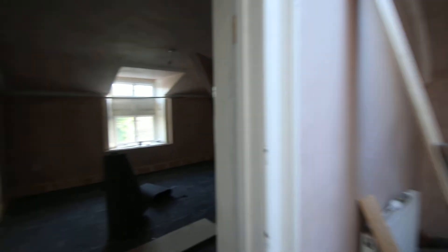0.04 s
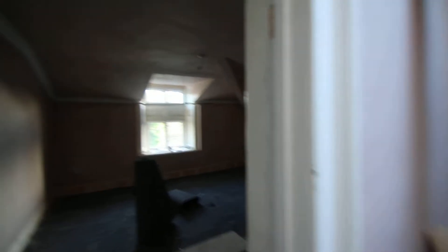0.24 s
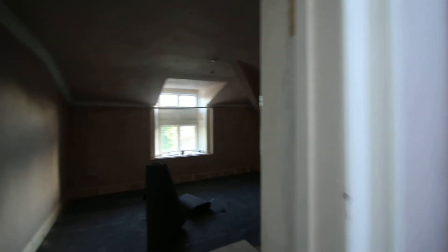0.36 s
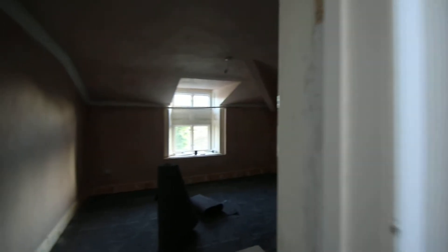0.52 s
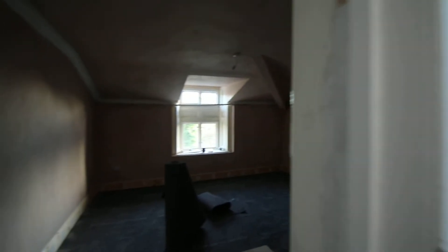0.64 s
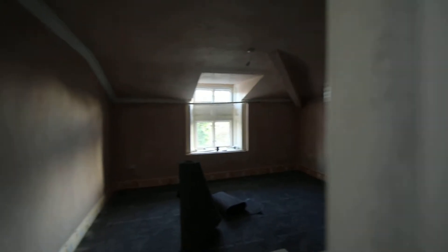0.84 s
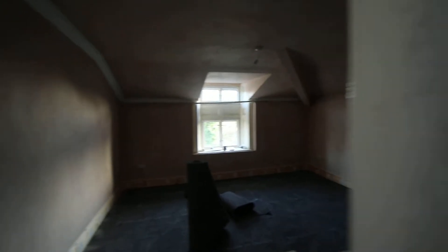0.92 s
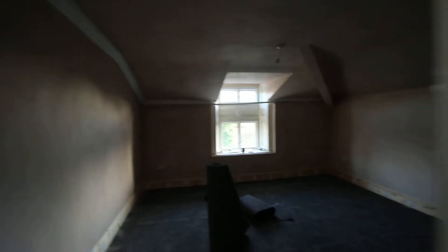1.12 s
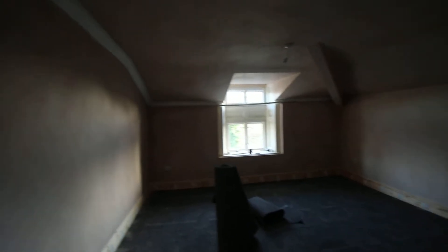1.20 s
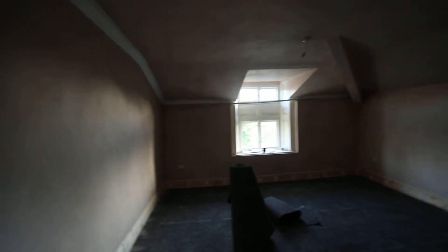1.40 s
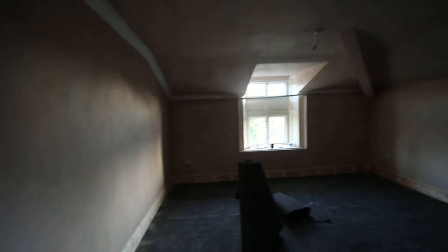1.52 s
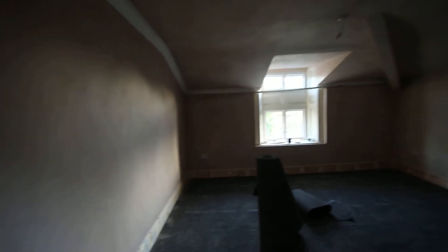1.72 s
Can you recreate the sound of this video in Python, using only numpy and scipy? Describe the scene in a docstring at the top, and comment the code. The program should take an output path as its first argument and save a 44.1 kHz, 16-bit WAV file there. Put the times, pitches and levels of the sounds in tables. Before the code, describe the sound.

Slow footsteps on bare floorboards in an empty room, one firm thud, then a softer step

```python
"""Empty house with bare floorboards: slow steps, heard by a hand-held stereo microphone.
One firm step, then a soft one whose sole rolls down: contact pushes ring board modes and diffuse room sound.
Close by: two dry clicks (short modes), a bump (pressure swings) and cloth rustle (patchy noise).
Behind: faint room tone and hiss (shaped noise), swelling airy tones (noise through narrow resonances)."""
import sys
import numpy as np
from scipy import signal
from scipy.io import wavfile

SR = 44100
rng = np.random.default_rng(int(sys.argv[2]) if len(sys.argv) > 2 else 0)


def magnitude_from_level(level_db):
    """Linear magnitude for a level in decibels (20 dB per decade)."""
    exponent = np.asarray(level_db, float) / 20
    return 10 ** exponent


def generate_wav(sig):
    """Save sig (samples, or channels by samples) to the path in sys.argv[1] as 16-bit PCM at SR."""
    pcm = np.round(np.clip(np.atleast_2d(sig).T, -1, 1) * 32767).astype(np.int16)
    wavfile.write(sys.argv[1], SR, pcm)


N = 77175


def at_hz(points, hz):
    """Reads a table on a log-frequency axis."""
    table_hz, values = np.transpose(points)
    return np.interp(np.log(hz), np.log(table_hz), values)


def pan(db):
    """Left and right gains; positive dB favours the left."""
    return magnitude_from_level(np.array([[db / 2], [-db / 2]]))


def filtered(kind, order, hz, x):
    """Butterworth filter."""
    return signal.sosfilt(signal.butter(order, hz, kind, fs=SR, output="sos"), x)


def drift(rate_hz):
    """Slow random wander, spread 1: low-passed noise made at SR / 40, then interpolated."""
    r = np.exp(-2 * np.pi * rate_hz * 40 / SR)
    noise = rng.standard_normal(N // 40 + 2002)
    slow = signal.lfilter([1], [1, -2 * r, r * r], noise)[2000:]
    return np.interp(np.arange(N) / 40, np.arange(len(slow)), slow / slow.std())


def ring(push, hz, t60_s):
    """Two-pole resonance: a unit click starts a decaying sine of height 1."""
    r, w = magnitude_from_level(-60 / (t60_s * SR)), 2 * np.pi * hz / SR
    return signal.lfilter([0, np.sin(w)], [1, -2 * r * np.cos(w), r * r], push + 1e-18)


def bands(spectrum, likeness, shape):
    """Half-octave bands of stereo noise, each with its level, left-right likeness and shape(hz) in time."""
    out = 0
    edges_hz = 26.9 * 2 ** np.arange(0, 9.6, .5)
    white = rng.standard_normal((2, 2, N + 8000))  # neighbouring bands use different noise
    for k, (low_hz, high_hz) in enumerate(zip(edges_hz, edges_hz[1:])):
        mid, side = filtered("band", 2, [low_hz, high_hz], white[k % 2])[:, 8000:]
        hz = np.sqrt(low_hz * high_hz)
        alike = np.clip(at_hz(likeness, hz), -.99, .999)
        stereo = np.sqrt(1 + alike) * mid + np.sqrt(1 - alike) * side * [[1], [-1]]
        out = out + magnitude_from_level(at_hz(spectrum, hz)) * shape(hz) * stereo
    return out


# shoe meets board: (t/s, level/dB, hardness f/Hz, extra level of joist modes/dB)
CONTACTS = [(0.2013, -22.5, 2730, 4), (0.206, -19.5, 675, 5), (0.2245, -17, 436, -3.5),
            (0.241, -26.5, 400, 0.5), (.283, -29, 410, -10), (.345, -32.5, 394, 3.5), (.392, -45, 398, -4),
            (0.444, -45, 395, 1), (1.0754, -34.5, 1400, -25), (1.081, -40.5, 490, -6),
            (1.092, -34.5, 247, 0.5), (1.101, -38.5, 300, -18), (1.141, -42.5, 315, -14),
            (1.152, -35, 494, -25), (1.165, -36, 450, -7), (1.18, -39.5, 304, -19), (1.223, -38.5, 244, 2)]
# floorboard and joist modes: (f/Hz, level/dB, t60/s)
BOARD_MODES = [(54.8, -25, 0.56), (96.55, -11.5, 0.49), (108.2, -18, 0.59), (116.6, 0.5, 0.039),
               (152, -5.5, 0.11), (166.4, -33, 0.47), (201.2, -0.5, 0.11), (214, -20.5, 0.16),
               (241.4, -19.5, 0.54), (313.5, -18, 0.28), (348, -16, 0.24), (361, -4.5, 0.077),
               (389, -16, 0.33), (510, -5.5, 0.061), (548, -19, 0.057), (705, -5, 0.057),
               (846, -0.5, 0.0078), (870, -4.5, 0.026), (1086, -0.5, 0.024), (1158, -3.5, 0.043),
               (1413, -7, 0.029), (1530, -2, 0.015)]
# colour of the diffuse step sound: (f/Hz, level/dB)
KNOCK_SPECTRUM = [(40, -8), (100, -30), (200, 19), (400, 10.5), (500, -0.5), (700, 3.5), (1100, 1.5),
                  (1600, 3.5), (2000, -8), (2800, 6), (5000, -4), (9000, 0.5), (15000, -8)]
# room decay: (f/Hz, t60/s)
ROOM_T60 = [(60, .7), (400, .45), (1000, .62), (1600, .58), (2500, .33), (10000, .25)]
# room stereo: (f/Hz, left-right likeness)
ROOM_LIKENESS = [(60, 1.0), (180, 0.98), (550, 0.8), (1650, 1), (4970, -0.054), (15000, -0.38)]
STRIKE_SPREAD_DB, JOIST_BELOW_HZ = 1.0, 125
ROOM_DB, ROOM_RISE_S = -5, 0.0033
DIFFUSE_ABOVE_HZ, FLOOR_LOWEST_HZ = 480, 42  # below the first, separate modes carry the sound
SETTLE_S, SETTLE_DB, SETTLE_TIME_S = 1.108, -2.5, .004  # settling sole muffles ringing boards
SOFT_STEP_FROM_S, SOFT_STEP_BODY_HZ = .9, (190, 290)
SOFT_STEP_THIN_DB = -5.5  # soft step: room, and modes above the joists outside its body
STEP_PAN_DB = 1.2


def contact_pushes():
    """One push per contact: a click low-passed at its hardness, as by the sole."""
    pushes = np.zeros((len(CONTACTS), N))
    for push, (s, db, hard_hz, _) in zip(pushes, CONTACTS):
        r = np.exp(-2 * np.pi * hard_hz / SR)
        click = (np.arange(N) == int(s * SR)) + 1e-18
        push[:] = signal.lfilter([magnitude_from_level(db) * (1 - r) ** 2], [1, -2 * r, r * r], click)
    return pushes


def board_ring(pushes, thin_db):
    """Pushes excite the board and joist modes; the settling sole lowers what already rings."""
    contact_s, joist_db = np.array(CONTACTS)[:, 0], np.array(CONTACTS)[:, 3]
    modes_hz = np.array(BOARD_MODES)[:, 0]
    low_hz, high_hz = SOFT_STEP_BODY_HZ
    outside_body = (modes_hz > JOIST_BELOW_HZ) & ((modes_hz < low_hz) | (modes_hz > high_hz))
    strength_db = STRIKE_SPREAD_DB * rng.standard_normal((len(CONTACTS), len(BOARD_MODES)))
    strength_db += np.outer(joist_db, modes_hz < JOIST_BELOW_HZ) + np.outer(thin_db, outside_body)
    strengths = magnitude_from_level(strength_db)
    groups = np.array([contact_s < SETTLE_S, contact_s >= SETTLE_S])
    ringing = np.zeros((2, N))
    for k, (hz, db, t60_s) in enumerate(BOARD_MODES):
        drive = groups * strengths[:, k] @ pushes
        ringing += (-1) ** k * magnitude_from_level(db) * ring(drive, hz, t60_s)
    before, after = ringing
    settled = np.clip((np.arange(N) / SR - SETTLE_S) / SETTLE_TIME_S, 0, 1)
    return before * magnitude_from_level(SETTLE_DB * settled) + after


def room_ring(pushes, thin_db):
    """Diffuse sound: pushes convolved with stereo noise that rises fast and dies by frequency."""
    t = np.arange(N) / SR
    rise = 1 - np.exp(-t / ROOM_RISE_S)
    echo = bands(KNOCK_SPECTRUM, ROOM_LIKENESS, lambda hz: magnitude_from_level(-60 * t / at_hz(ROOM_T60, hz)) * rise)
    room = signal.fftconvolve(echo, (magnitude_from_level(thin_db) @ pushes)[None], axes=1)[:, :N]
    return filtered("high", 2, DIFFUSE_ABOVE_HZ, room)


def steps():
    """Each contact pushes the boards' modes and the dying diffuse sound of the room."""
    pushes = contact_pushes()
    thin_db = SOFT_STEP_THIN_DB * (np.array(CONTACTS)[:, 0] > SOFT_STEP_FROM_S)
    both = board_ring(pushes, thin_db) + magnitude_from_level(ROOM_DB) * room_ring(pushes, thin_db)
    return pan(STEP_PAN_DB) * filtered("high", 3, FLOOR_LOWEST_HZ, both)


# board hum as the weight rolls over: (t/s, level/dB, f/Hz, time to peak/s)
HUMS = [(0.223, -32, 399.3, 0.0064), (.29, -41.5, 348, 0.025), (.385, -47.5, 389, 0.026),
        (1.142, -49, 254, 0.014)]


def board_hum():
    """A single mode swells and dies under each shift of weight: sine under age * exp(-age)."""
    out = 0
    for s, db, hz, peak_s in HUMS:
        age_s = np.maximum(np.arange(N) / SR - s, 0)
        envelope = age_s / peak_s * np.exp(1 - age_s / peak_s)
        out = out + magnitude_from_level(db) * envelope * np.sin(2 * np.pi * hz * age_s)
    return pan(STEP_PAN_DB) * out


# band kept of the clicks: low f/Hz, high f/Hz
CLICK_BAND_HZ = [600, 11500]


def clicks(touches, modes, turn):
    """Small hard touches ring short-lived modes; every second mode is scaled by turn on the right."""
    out = np.zeros((2, N))
    for s, db, pan_db in touches:
        touch = magnitude_from_level(db) * (np.arange(N) == int(s * SR))
        for k, (hz, mode_db, t60_s) in enumerate(modes):
            mode = (-1) ** k * magnitude_from_level(mode_db) * ring(touch, hz, t60_s)
            out += pan(pan_db) * [[1], [turn ** (k % 2)]] * mode
    return filtered("band", 3, CLICK_BAND_HZ, out)


# first near click, touches: (t/s, level/dB, pan/dB)
TICK_TOUCHES = [(1.3002, -33, 5.7), (1.3005, -31, 9.5), (1.3008, -35, 8.1), (1.3022, -39, 2.4)]
# its modes: (f/Hz, level/dB, t60/s)
TICK_MODES = [(4410, -6, 0.012), (6540, -12.5, 0.0032), (8350, 3.5, 0.0021), (8980, 5, 0.0025),
              (11300, -4.5, 0.0042)]


def tick():
    """First dry click: touches ringing high, short modes."""
    return clicks(TICK_TOUCHES, TICK_MODES, turn=.8)


# second near click, touches: (t/s, level/dB, pan/dB)
SNAP_TOUCHES = [(1.4040, -67, 15), (1.4047, -29.5, -5.5), (1.4054, -31.5, -18.5)]
# its modes: (f/Hz, level/dB, t60/s)
SNAP_MODES = [(805, -2.5, 0.022), (1060, -15, 0.024), (1550, -20, 0.053), (1960, -8, 0.021),
              (2343, 3.5, .014), (3400, -5, 0.016), (3740, -17, 0.026), (5700, -8, 0.0046),
              (7490, -16.5, 0.014), (9500, -39, 0.0027)]


def snap():
    """Second dry click: lower modes too, every second one inverted on the right."""
    return clicks(SNAP_TOUCHES, SNAP_MODES, turn=-1.12)


# bumps on the microphone body: (t/s, level/dB, length/s, pan/dB)
BUMPS = [(1.442, -47, 0.0068, 24), (1.453, -43, 0.0056, 3), (1.4575, -38.5, 0.0018, 6),
         (1.475, -39.5, 0.01, 18.5), (1.485, -40, 0.0077, 3)]


def bumps():
    """Single soft swings of pressure (sine squared), alternately up and down."""
    t = np.arange(N) / SR
    out = np.zeros((2, N))
    for k, (s, db, length_s, pan_db) in enumerate(BUMPS):
        swing = np.sin(np.pi * np.clip((t - s) / length_s, 0, 1)) ** 2
        out += (-1) ** k * pan(pan_db) * magnitude_from_level(db) * swing
    return out


# cloth rustle: (t/s, level/dB, rise/s, fall/s)
RUSTLES = [(.48, -52, 0.051, 0.086), (1.462, -51.5, 0.0083, 0.1)]
# rustle colour: (f/Hz, level/dB)
RUSTLE_SPECTRUM = [(150, 28.5), (500, 22), (1500, 2), (3000, 16.5), (6000, 5.5), (12000, -7)]
# stereo of rustle and room tone: (f/Hz, left-right likeness)
TONE_LIKENESS = [(60, 0.88), (180, 0.49), (550, 0.75), (1650, 0.15), (4970, 0.021), (15000, 0.025)]


def rustle():
    """Patchy noise with a Gaussian rise and an exponential fall."""
    t = np.arange(N) / SR
    swell = 0
    for s, db, rise_s, fall_s in RUSTLES:
        decay = np.where(t < s, ((s - t) / rise_s) ** 2, (t - s) / fall_s)
        swell = swell + magnitude_from_level(db) * np.exp(-decay)
    cloth = bands(RUSTLE_SPECTRUM, TONE_LIKENESS, lambda hz: magnitude_from_level(1.5 * drift(25.0)))
    return swell * cloth / cloth.std()


# room tone and hiss: (f/Hz, level/dB)
TONE_SPECTRUM = [(22, -16), (40, -2.5), (90, 0.5), (200, -4), (450, -4), (700, -7.5), (1300, -11.5),
                 (2000, -11.5), (4000, -16), (9000, -20), (14000, -25), (16000, -30)]
TONE_DB, TONE_PAN_DB = -55.5, 1.85


def air_and_hiss():
    """Steady shaped noise; the bass wavers most."""
    tone = bands(TONE_SPECTRUM, TONE_LIKENESS, lambda hz: magnitude_from_level(2.0 * drift(5.0) / (1 + hz / 300)))
    return magnitude_from_level(TONE_DB) * tone / tone.mean(axis=0).std()


# narrow airy tones: (f/Hz, width/Hz, level/dB)
AIRY_TONES = [(424.4, 40, -0.5), (1058, 140, -5), (1327, 96, -4.5), (1568, 74, 1.5)]
# their common swell: (t/s, level/dB)
AIRY_SWELL = [(0, -61), (0.038, -60.5), (.13, -63.5), (.18, -66), (.33, -61.5), (.4, -68), (.44, -57.5),
              (.55, -58.5), (.66, -62), (.75, -69.5), (.81, -62), (.91, -57.5), (.98, -64.5), (1.01, -91),
              (1.1, -68), (1.15, -63.5), (1.31, -62), (1.37, -69.5), (1.43, -68), (1.46, -61.5),
              (1.6, -68.5), (1.75, -72)]


def airy_tones():
    """Noise through narrow resonances, swelling and fading together."""
    swell_db = np.interp(np.arange(N) / SR, *np.transpose(AIRY_SWELL))
    out = 0
    for hz, width_hz, db in AIRY_TONES:
        alike = at_hz(TONE_LIKENESS, hz)
        mid, side = ring(rng.standard_normal((2, N)), hz, 2.2 / width_hz)  # t60 from bandwidth
        stereo = mid + np.sqrt((1 - alike) / (1 + alike)) * side * [[1], [-1]]
        out = out + magnitude_from_level(db + swell_db) * stereo / mid.std()
    return out


def room_tone():
    """Air, hiss and airy tones, slightly to the left."""
    return pan(TONE_PAN_DB) * (air_and_hiss() + airy_tones())


def scene():
    """All sources together."""
    return steps() + board_hum() + tick() + snap() + bumps() + rustle() + room_tone()


def band_limit(x):
    """A steep low-pass at the top of the band."""
    return signal.sosfilt(signal.butter(12, 16090, fs=SR, output="sos"), x)


RIGHT_LAG_S, CUTOFF_HZ, BASS_CUT_HZ = .00013, 16500, 28.0


def record(dry):
    """Right capsule hears slightly later; the top and the deepest bass are dropped."""
    late_right = np.pad(dry[1], (round(RIGHT_LAG_S * SR), 0))[:N]
    spaced = np.array([dry[0], late_right])
    topless = signal.sosfilt(signal.cheby2(16, 60, CUTOFF_HZ, fs=SR, output="sos"), spaced)
    mix = filtered("high", 2, BASS_CUT_HZ, topless)
    return band_limit(mix)


dry = scene()
out = record(dry)
generate_wav(out)
```